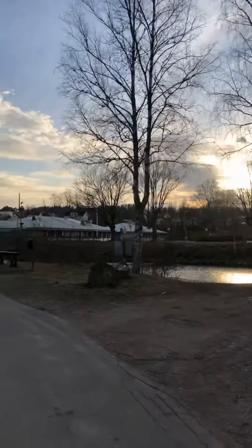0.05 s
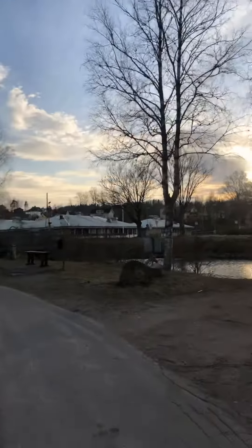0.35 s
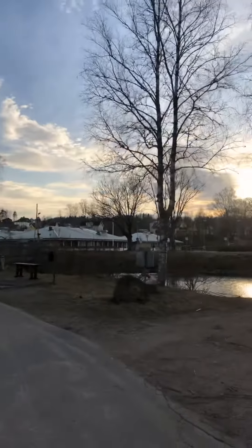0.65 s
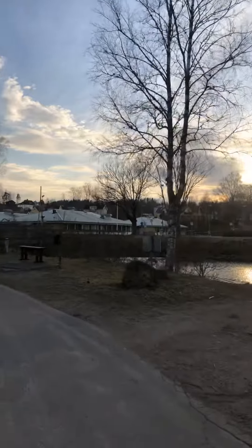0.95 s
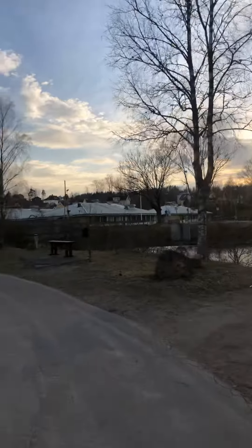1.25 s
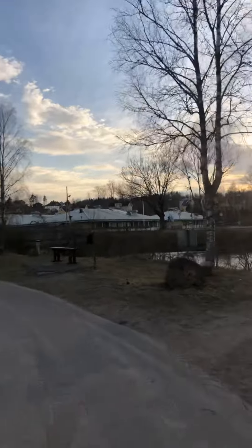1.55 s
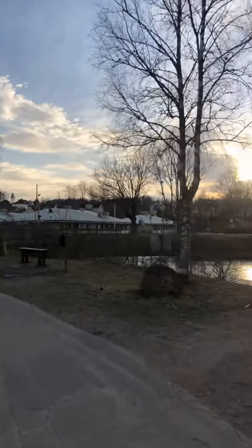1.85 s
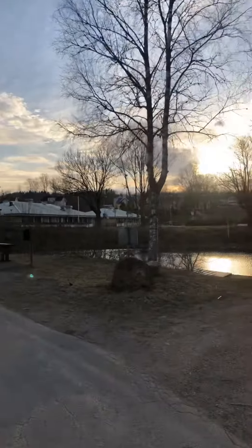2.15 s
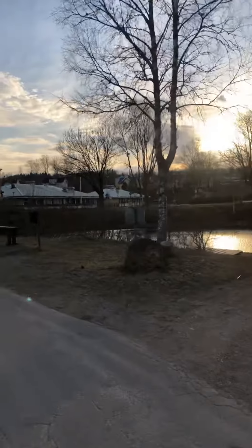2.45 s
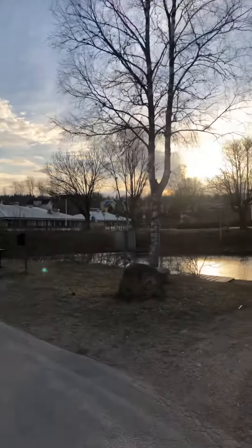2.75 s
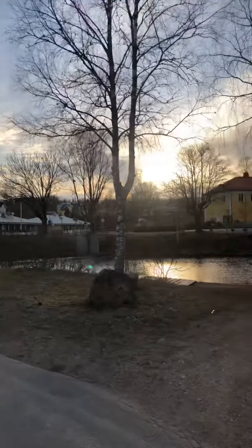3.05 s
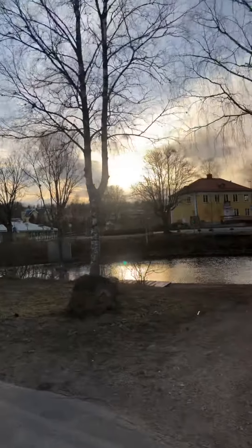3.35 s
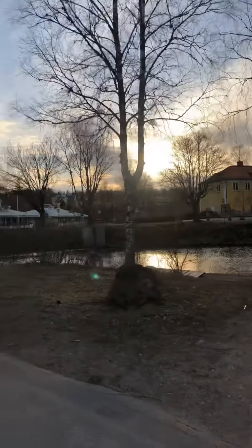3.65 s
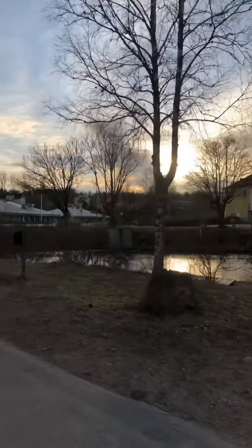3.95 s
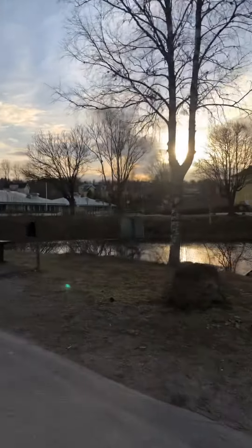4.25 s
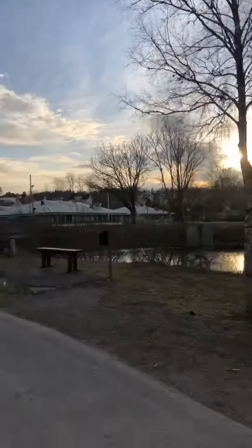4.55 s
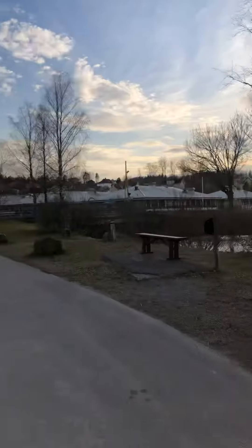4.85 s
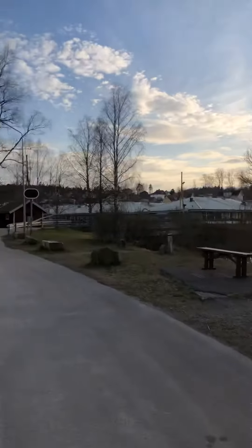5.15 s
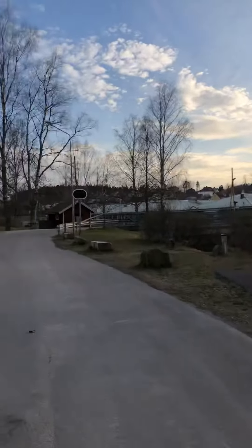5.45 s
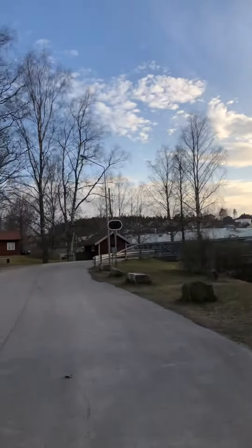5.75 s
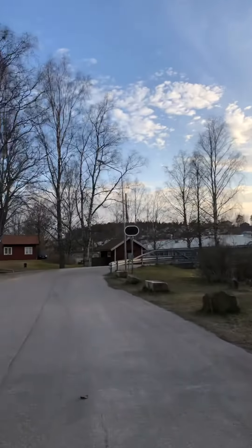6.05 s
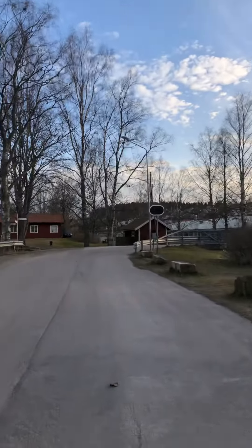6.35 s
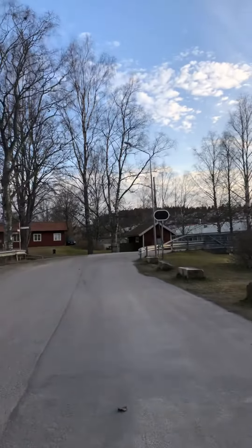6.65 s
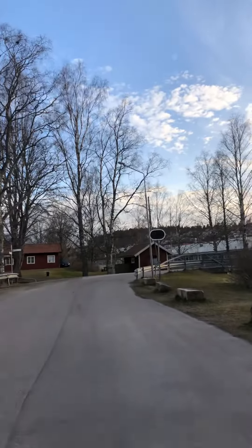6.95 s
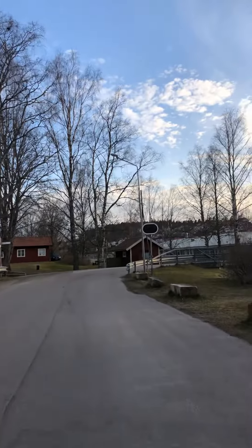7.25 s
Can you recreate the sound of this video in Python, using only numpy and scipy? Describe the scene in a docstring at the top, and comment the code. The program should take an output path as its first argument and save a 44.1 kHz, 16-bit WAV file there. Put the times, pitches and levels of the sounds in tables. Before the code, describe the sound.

Outdoors by a pond, light wind thuds and pops on the microphone as someone walks, shoes scuffing faintly on grit. A distant gull calls briefly. Then a nearer gull gives harsh cries that break twice into high, falling squeals, followed by four short yelps, with slight echoes from across the water. The wind drops before the yelps, leaving soft footsteps and a faint distant hiss.

```python
"""A gull gives its long call over a pond: two squealing cries that break into a high register and fall,
then a run of short yelps, all from the fluttering membrane of its syrinx. Another gull answers faintly
from far off, and houses across the water throw the cries back. Someone walks with the microphone:
shoes scuff on grit, and a light wind thuds and pops on the microphone until it drops."""
import sys
import numpy as np
from scipy import signal
from scipy.fft import rfft, irfft
from scipy.io import wavfile
from scipy.ndimage import uniform_filter1d

SR = 44100
rng = np.random.default_rng(int(sys.argv[2]) if len(sys.argv) > 2 else 0)


def store_pcm(level_fs):
    """Save levels as 16-bit WAV."""
    pcm = np.round(np.clip(level_fs, -1, 1) * 32767).astype(np.int16)
    wavfile.write(sys.argv[1], SR, np.atleast_2d(pcm).T)


N = 321930
TIME = np.arange(N) / SR


# Full voice, one curve a syllable. Roughness runs 0-1; tilt is per harmonic.
# time_s, pitch_hz, second_harmonic_db, other_harmonics_db, tilt_db, roughness
CRY_CURVES = [
    [(1.6, 1207, -60.5, -80, 1, 0.4), (1.622, 1234, -53, -59.5, -4.5, 0),
     (1.648, 1258, -44.5, -55, -5, 0.16), (1.662, 1220, -49, -60.5, 4, .45),
     (1.674, 1050, -58, -73, -2, 1.1), (1.69, 900, -66, -70, -2, 1)],
    [(1.905, 981, -79, -78.5, -6, 0.4), (1.954, 1181, -61, -63, 4, .8), (1.965, 1192, -34.5, -54, 2.5, .04),
     (2.04, 1181, -39.5, -54, 1.5, .02), (2.14, 1196, -46, -52.5, -8.5, 0.06),
     (2.21, 1266, -53, -53, -2, .22), (2.28, 1278, -55, -57, 4, .25), (2.34, 1306, -62, -55, 10.5, 0.13),
     (2.378, 1370, -59, -58, 1, 0.34)],
    [(2.533, 1305, -71, -62, 3, 0.9), (2.555, 1259, -64.5, -50.5, 2.5, 0.08),
     (2.67, 1237, -60, -57.5, 0, 0.12), (2.79, 1246, -58, -62.5, -5.5, 0.11),
     (2.84, 1220, -52.5, -53, -5, 0.16), (2.905, 1113, -54, -53, -4, .55), (2.955, 1069, -57, -59, -2, .4),
     (3.015, 1044, -71, -66, 2, .45), (3.045, 915, -42, -72.5, 2, 0.05), (3.08, 861, -51, -67, 8.5, 0.27)],
    [(3.53, 870, -40, -76.5, -0.5, 0.13), (3.55, 1134, -77, -64, 5, 0.54),
     (3.572, 1228, -68.5, -54, 0.5, 0.12), (3.63, 1221, -53, -59, -1, 0.2),
     (3.69, 1246, -69, -50, 1.5, .12), (3.738, 1283, -74, -51, 3, .2)],
    [(4.025, 1270, -46.5, -61, -2, 0.3), (4.06, 1261, -41, -53, 4.5, 0), (4.12, 1240, -42, -54.5, 1, .2),
     (4.129, 1059, -45.5, -63.5, -1, .9), (4.14, 930, -37, -57, 3.5, 0.04),
     (4.158, 887, -60.5, -59, -7, .9)],
    [(4.314, 963, -41, -67, -18.5, 0), (4.33, 1018, -39, -71, -12, 0), (4.36, 1069, -51.5, -53.5, 3, 0.22),
     (4.385, 1097, -34.5, -59.5, 1, 0)],
    [(4.508, 1020, -40.5, -73, 1.5, 0.08), (4.53, 965, -41, -49.5, 1, 0.06),
     (4.574, 1001, -42, -67.5, 0.5, .3), (4.587, 903, -50.5, -64, 4.5, .5)],
]
# High, whistling register, one curve a squeal: time_s, pitch_hz, fundamental_db, second_harmonic_db
SQUEAL_CURVES = [
    [(2.374, 3370, -38.5, -58), (2.47, 3337, -39, -56), (2.505, 3243, -34.5, -45),
     (2.54, 3200, -38.5, -46.5)],
    [(3.735, 3195, -42.5, -44), (3.785, 3222, -39, -44.5), (3.825, 3194, -42.5, -44),
     (3.87, 3040, -38, -46), (3.92, 2777, -41, -45), (3.97, 2644, -43.5, -45.5), (4.03, 2540, -42, -45.5)],
    [(4.38, 2464, -41.5, -77), (4.44, 2524, -44, -73), (4.48, 2468, -38, -53), (4.512, 2393, -35.5, -62)],
]
# Closing yelps; the third and upper harmonics are relative to level_db.
# start_s, length_s, top_hz, level_db, third_db, upper_db
YELP_NOTES = [(4.738, .229, 1079, -43, -14.5, -34), (5.133, .18, 1122, -42.5, -4.5, -35),
              (5.508, .147, 1154, -44, -10, -29), (5.901, .13, 1167, -44, -13, -39.5)]
def near_gull(squeal_rough=0.018):
    """The gull over the pond: its voice flips between two registers, then yelps."""
    out = np.zeros(N)
    for curve in CRY_CURVES:
        add(out, *cry(curve))
    for curve in SQUEAL_CURVES:
        times, pitch, *harmonics = np.transpose(curve)
        add(out, *syrinx(times, pitch, harmonics, squeal_rough))
    for note in YELP_NOTES:
        add(out, *yelp(*note))
    return out


# Resonances of the gull's throat: frequency_hz, gain_db
THROAT_RESONANCES = [(900, -20), (1180, -20), (1290, 1.5), (2900, 0.5), (3400, -3.5), (3650, -5.5),
                     (3820, 0), (4400, 3), (4900, 2.5), (5500, 2), (5950, 11), (6300, 1.5), (7000, -0.5)]
def cry(curve, waver_db=5, waver_s=0.04, membrane_db=(0, 0, 0, 0, -8.5, -19)):
    """A dominant second harmonic; the others waver and slide through the resonances of the throat."""
    knots, *controls = np.transpose(curve)
    times = np.linspace(knots[0], knots[-1], num=200)
    pitch, second, others, bright, rough = (np.interp(times, knots, control) for control in controls)
    drifts = rng.standard_normal((6, 60))
    harmonics = []
    for k, (falloff, drift) in enumerate(zip(membrane_db, drifts), 1):
        tilt = bright * (k - 4) * (k > 2)
        waver = waver_db * np.interp((times - times[0]) / waver_s, np.arange(len(drift)), drift)
        throat = value_at(THROAT_RESONANCES, k * pitch)
        harmonics.append(second if k == 2 else others + falloff + tilt + waver + throat)
    return syrinx(times, pitch, harmonics, rough)


# Balance of a yelp's harmonics 4, 5 and 6: gain_db
YELP_OVERTONES = [-1, 0, -15]
def yelp(start, length, top_hz, level_db, third_db, upper_db, rough=0.06, slack=0.49,
         attack_s=0.017, release_s=0.031, swell_db=4, waver_db=1.3, crack_db=27.5):
    """A short note that scoops up, swells, and cracks as its pitch drops; a slack membrane rattles."""
    t = np.linspace(0, length, num=60)
    scoop = np.exp(-t / 0.0141)
    drop = np.exp((t - length) / 0.012)  # the breath ends
    sag = 0.0968 * scoop + 0.2 * drop
    edges = np.maximum(1 - t / attack_s, 0) + np.maximum(1 - (length - t) / release_s, 0)
    held = level_db - 24 * edges
    second = held + swell_db * (np.sin(np.pi * t / length) - 2 / np.pi)
    upper = [held + upper_db + colour + crack_db * np.sqrt(drop) for colour in YELP_OVERTONES]
    waver = waver_db * unit_rms(uniform_filter1d(rng.standard_normal((6, 60)), size=8, axis=1))
    harmonics = np.array([second - 37, second, held + third_db, *upper]) + waver
    return syrinx(start + t, top_hz * (1 - sag), harmonics, rough + slack * sag)


def syrinx(times, pitch, harmonics_db, rough, jitter=0.015, rasp=0.96, doubling=0.048, edge_s=0.005):
    """A fluttering membrane that jitters and rasps as it roughens. Returns start time and sound."""
    t = np.arange(times[0] - edge_s / 2, times[-1] + edge_s / 2, 1 / SR)
    rough = np.interp(t, times, np.clip(rough * np.ones(len(times)), 0, 1))
    glide = uniform_filter1d(np.interp(t, times, pitch), size=500)
    hz = glide * (1 + jitter * rough * wander(len(t), 220))
    phase = 2 * np.pi * np.cumsum(hz) / SR
    out = np.zeros(len(t))
    for k, db in enumerate(harmonics_db, 1):
        flutter = np.exp(0.16 * np.sqrt(k / 2) * (wander(len(t), 70) + 1j * wander(len(t), 70)))
        sidebands = rasp * (wander(len(t), 170) + 1j * wander(len(t), 250))
        shimmer = wander(len(t), 49)
        subharmonic = doubling * np.exp(-0.5j * phase)  # strong and weak cycles alternate
        envelope = gain(np.interp(t, times, db)) * (flutter + rough * (sidebands + shimmer + subharmonic))
        out += np.sqrt(2) * (envelope * np.exp(1j * k * phase)).real
    return t[0], out * signal.windows.tukey(len(t), 2 * edge_s / (t[-1] - t[0]))


# The answering bird: start_s, length_s, pitch_hz, level_db, tilt_db (per harmonic)
FAR_NOTES = [(0.013, 0.053, 1172, -60.5, 0), (0.263, .026, 1098, -63, -10.5), (.353, 0.055, 1107, -60, -6),
             (0.552, 0.018, 1123, -64.5, 3), (0.577, 0.043, 1228, -58, 3), (.595, .06, 1122, -57, 6),
             (0.676, 0.17, 1126, -66, 2.5), (0.87, .09, 1055, -66, 1), (1.228, 0.022, 1007, -64, 3),
             (1.26, 0.054, 1234, -65, -3.5), (7.127, 0.13, 1130, -77, -13)]
def far_gull(colour_db=(-25, -1, -2, -14), arch=0.04, rough=0.35):
    """A second gull, far off: short hoarse notes, each an arch of pitch."""
    out, progress = np.zeros(N), np.linspace(0, 1, num=9)
    droop = (2 * progress - 1) ** 2
    for start, length, pitch, db, tilt in FAR_NOTES:
        harmonics = [db + colour + tilt * (k - 1) - 6 * droop for k, colour in enumerate(colour_db)]
        add(out, *syrinx(start + length * progress, pitch * (1 - arch * droop), harmonics, rough))
    return out


# Echoes off the houses, coming and going as the walker moves: delay_s, gain_db, strongest_s, width_s
HOUSE_ECHOES = [(.013, -13.5, 2.8, 0.54), (.031, -10.5, 2.7, 0.22), (0.03, -12, 4.03, 0.14),
                (.058, -14.5, 3.97, 0.11), (.147, -25.5, 4.25, .12), (.088, -17.5, 4.6, .1),
                (.262, -6, 4.72, 0.12), (0.15, -3.5, 5.03, 0.051), (.041, -9, 5.33, .035),
                (.028, -8.5, 5.88, .25), (.35, -21, 6.3, 0.23)]
# Decay of the open-air tail: frequency_hz, t60_s
TAIL_DECAY = [(500, 0.25), (2300, 0.95), (4000, .6), (7000, 0.8)]
def pond_echoes(call, tail_db, scatter_db, scatter_t60_s=0.18, smear=2.3, reflections_per_s=1500):
    """A call with quick scatter from ground and trunks, echoes from across the water and a thin tail."""
    t = TIME[:SR]
    near, far = rng.standard_normal((2, SR)) * (rng.random((2, SR)) < reflections_per_s / SR)
    near *= gain(-60 * t / scatter_t60_s) * (t > 0.006)
    scattered = signal.fftconvolve(call, near / np.linalg.norm(near))[:N]
    bounced = (call + smear * scattered) / np.hypot(1, smear)  # uneven walls smear what they return
    out = call + gain(scatter_db) * scattered
    for delay, db, strongest, width in HOUSE_ECHOES:
        cutoff_hz = min(5600 * (0.054 / delay) ** 0.71, SR / 3)  # longer paths lose more treble
        dulled = signal.sosfilt(signal.butter(3, cutoff_hz, fs=SR, output="sos"), bounced)
        presence = np.exp(-0.5 * ((TIME + delay - strongest) / width) ** 2)
        add(out, delay, gain(db) * dulled * presence)
    hz, age, spectrum = signal.stft(far, SR, nperseg=256)
    decay = gain(-60 * age / value_at(TAIL_DECAY, hz)[:, None])
    tail = signal.istft(spectrum * decay, SR, nperseg=256)[1]
    return out + gain(tail_db) * signal.fftconvolve(call, tail / np.linalg.norm(tail))[:N]


# The strongest puffs of air on the microphone: time_s, peak_db, pitch_hz, length_s
STRONG_PUFFS = [(.024, -25.5, 225, 0.0088), (.042, -34, 240, 0.0096), (.068, -24.5, 230, 0.0072),
                (.151, -39, 270, .004), (.44, -41.5, 184, 0.0081), (.503, -37.5, 210, 0.0056),
                (.647, -37, 260, .004), (.664, -36.5, 236, .006), (.687, -34.5, 225, 0.0051),
                (.808, -27.5, 230, 0.0035), (.885, -34.5, 230, 0.0078), (1.12, -30, 215, 0.012),
                (1.168, -30.5, 230, 0.0033), (1.548, -32, 315, 0.0065), (1.759, -36, 205, .0075),
                (1.899, -34, 295, .008), (1.942, -31.5, 200, 0.0066), (2.05, -26.5, 210, 0.0084),
                (2.175, -36.5, 225, .006), (2.354, -36.5, 290, 0.0066), (2.532, -26, 280, 0.0041),
                (2.615, -32.5, 300, .0027), (2.631, -30.5, 250, 0.0039), (2.844, -32, 220, 0.0073),
                (2.94, -27.5, 370, 0.0023), (2.955, -28.5, 330, 0.0034), (2.978, -28, 250, .004),
                (3.061, -33.5, 255, 0.0063), (3.408, -26.5, 280, 0.0023), (3.421, -36, 340, 0.029),
                (3.442, -36.5, 230, 0.009), (3.756, -32, 240, 0.0056), (3.869, -37, 200, 0.0052),
                (4.084, -36.5, 275, 0.0065), (4.256, -38.5, 250, 0.0071)]
# Flurries of weaker puffs: start_s, length_s, peak_db
PUFF_FLURRIES = [(0.126, 0.13, -44), (0.519, 0.039, -39.5), (1.085, .02, -34.5), (1.175, .03, -36),
                 (1.547, 0.052, -34.5), (1.812, .56, -41), (2.99, .06, -37.5), (3.45, .015, -36.5),
                 (3.98, .02, -46), (4.111, 0.18, -43.5), (4.341, .02, -48), (4.472, 0.019, -48.5)]
def wind_thuds(puffs_per_s=29, spread_db=3, puff_hz=250, puff_s=0.005, churn_db=-11):
    """Low thuds of air right on the microphone, with a churn of turbulence clinging to each."""
    puffs = list(STRONG_PUFFS)
    for start, span, db in PUFF_FLURRIES:
        count = max(round(span * puffs_per_s), 1)
        places, sizes = rng.random(40), rng.standard_normal((40, 2))
        for k, (place, (loud, long)) in enumerate(zip(places[:count], sizes)):
            when = start + span * (k + place) / count
            stretch = np.exp(0.3 * long)  # longer puffs are deeper
            puffs.append((when, db + spread_db * loud, puff_hz / np.sqrt(stretch), puff_s * stretch))
    thuds = air_pulses(puffs, rise_share=0.88, sharpness=5.04)
    window = np.hanning(1800)
    force = np.sqrt(abs(signal.fftconvolve(thuds ** 2, window / window.sum(), "same")))
    churn_spectrum = [(60, -18.5), (150, 1), (380, 5.5), (600, -10.5), (1000, -33), (2000, -51.5)]
    churn = coloured(rng.standard_normal(N), churn_spectrum)
    return thuds + gain(churn_db) * force * churn


# Sharper gusts in the microphone's port: time_s, peak_db, pitch_hz, length_s
PORT_GUSTS = [(.392, -41, 890, .007), (.979, -36.5, 887, .008), (1.231, -29.5, 984, 0.0035),
              (1.29, -40, 845, 0.013), (1.316, -32.5, 1030, 0.0024), (1.361, -31, 934, 0.0035),
              (1.529, -38.5, 1034, 0.0023), (1.644, -29, 920, 0.0051), (2.758, -32.5, 884, 0.011),
              (2.893, -43, 918, .008), (3.136, -44.5, 835, .015), (3.262, -31.5, 960, .007),
              (3.289, -38, 956, .003), (3.303, -35, 1060, 0.0035), (3.551, -43, 846, 0.014)]
def wind_pops(ring_hz=880, ring_width_hz=130, eddy_t60_s=0.17, ring_db=-5, lead_s=0.0022):
    """Wind pops in the microphone's port; the eddy around each keeps a narrow resonance ringing."""
    # a weaker pop trails each gust
    trailing = [(when + rng.uniform(0.0119, 0.01224), db - 12.5, 836, 0.015) for when, db, *_ in PORT_GUSTS]
    pops = air_pulses(list(PORT_GUSTS) + trailing, rise_share=0.66, sharpness=4.55)
    t = TIME[:SR // 3] - TIME[SR // 30]
    eddy = np.where(t < 0, np.exp(-abs(t) / lead_s), gain(-60 * abs(t) / eddy_t60_s))
    stir = signal.fftconvolve(pops, eddy * rng.standard_normal(len(t)))[SR // 30:][:N]
    ring = signal.lfilter(*signal.iirpeak(ring_hz, ring_hz / ring_width_hz, fs=SR), stir)
    return pops + gain(ring_db) * pops.std() * unit_rms(ring)


def air_pulses(rows, rise_share, sharpness):
    """Each blow of air is a few cycles that swell quickly and die a little more slowly."""
    out, t = np.zeros(N), np.arange(-SR // 40, SR // 15) / SR
    for when, db, hz, length in rows:
        age = np.maximum(1 + t / (rise_share * length), 0)
        swell = (age * np.exp(1 - age)) ** sharpness
        add(out, when + t[0], gain(db) * swell * np.cos(2 * np.pi * (hz * t + rng.random())))
    return out


# Strokes of a sole: loudest_s, relative_level_db, rise_s, fall_s, tilt_db (per octave)
SOLE_STROKES = [(.61, -53, 0.081, .08, -4), (.624, -46, .004, .02, -4), (.69, -54, 0.13, 0.26, -2),
                (.76, -53.5, .03, .09, 2), (1.52, -54.5, 0.16, 0.13, -1), (1.61, -49.5, 0.12, 0.095, -4.5),
                (2.54, -55, .02, 0.057, 3.5), (3.337, -57, 0.023, 0.02, -4.5),
                (5.22, -64.5, 0.023, 0.015, -18.5), (5.68, -68.5, .02, 0.045, -13)]
# Spectrum of grinding grit: frequency_hz, gain_db
GRIT_SPECTRUM = [(710, -38), (1200, -10), (1500, -15), (1590, -9.5), (2000, -2.5), (2160, -14.5),
                 (2360, -1), (3450, 3.5), (4650, -9), (6800, -7.5), (7390, -24.5), (9610, -48.5),
                 (16300, -120)]
def shoe_scuffs(grains_per_s=4000, slide=0.61, edge_db=-26, patchy_db=1.8):
    """Below the microphone, fine grit grinds under a sliding sole; its colour shifts with the stroke."""
    sizes = gain(3 * np.minimum(rng.exponential(1, N), 3))
    grains = rng.standard_normal(N) * sizes * (rng.random(N) < grains_per_s / SR)
    grit = coloured(unit_rms(grains) + slide * rng.standard_normal(N), GRIT_SPECTRUM)
    times, *_, tilts = np.transpose(SOLE_STROKES)
    tilt, out = np.interp(TIME, times, tilts), np.zeros(N)
    edges_hz = np.geomspace(700, 7600, num=9)
    for low, high in zip(edges_hz, edges_hz[1:]):
        band = signal.sosfilt(signal.butter(2, [low, high], "bandpass", fs=SR, output="sos"), grit)
        out += band * gain(patchy_db * wander(N, 50) + tilt * np.log2(high / 3500))
    pressure = sum(gain(db + edge_db * np.maximum((when - TIME) / rise, (TIME - when) / fall))
                   for when, db, rise, fall, _ in SOLE_STROKES)
    return gain(8.5) * out * pressure


# The walker's steps: time_s, level_db
STEPS = [(5.079, -64), (5.689, -65), (6.2, -65.5), (6.34, -66), (6.77, -72.5)]
def footfalls(width_s=0.037):
    """Dull pats of a soft sole on asphalt, close by."""
    spectrum = [(60, -30), (130, -16.5), (210, 2.5), (400, -1.5), (800, -12.5), (1800, -11), (4000, -32)]
    pat = coloured(rng.standard_normal(N), spectrum)
    return pat * sum(gain(db) * np.exp(-((TIME - when) / width_s) ** 2) for when, db in STEPS)


# Strength of the breeze: time_s, level_db
BREEZE_LEVELS = [(0, -62.5), (.3, -67.5), (.55, -64.5), (1.55, -61), (2.2, -66), (2.45, -73), (2.56, -62),
                 (4.3, -63), (4.5, -66), (4.65, -105)]
# Its spectrum: frequency_hz, gain_db
BREEZE_SPECTRUM = [(60, -36), (120, -17.5), (200, -1.5), (320, -9), (450, -2.5), (750, 3), (900, -3),
                   (1150, -26.5), (2000, -37.5), (4000, -52.5)]
def breeze(gust_db=2):
    """A lumpy breeze blows across the microphone, then drops."""
    rush = coloured(rng.standard_normal(N), BREEZE_SPECTRUM)
    return rush * level_curve(BREEZE_LEVELS) * gain(gust_db * wander(N, 21))


# Outdoor wash beyond the pond: time_s, level_db
WASH_LEVELS = [(0, -65), (2.5, -67), (4, -65), (5.3, -67), (6.2, -66), (6.6, -72.5), (6.85, -67.5),
               (7.15, -73), (7.3, -68.5)]
# Its spectrum: frequency_hz, gain_db
WASH_SPECTRUM = [(100, -18), (170, -1), (300, 10), (500, 9.5), (800, 5), (1500, 1.5), (2250, 1.5),
                 (3500, -1), (4500, -3.5), (6200, -5.5), (7400, -16)]
# Its bass, which dips near the end: time_s, gain_db
WASH_BASS_GAINS = [(6.7, -3), (7.1, -11), (7.25, -2)]
def distant_wash(flicker_db=2.28, bass_hz=450):
    """The faint hiss of the distance, flickering slightly."""
    wash = coloured(rng.standard_normal(N), WASH_SPECTRUM)
    wash *= level_curve(WASH_LEVELS) * gain(flicker_db * wander(N, 14))
    bass = signal.sosfiltfilt(signal.butter(2, bass_hz, fs=SR, output="sos"), wash)
    bass_gain = gain(np.interp(TIME, *np.transpose(WASH_BASS_GAINS)))
    return wash + bass * (bass_gain - 1)


def gain(db):
    """Decibels to amplitude."""
    return 10 ** (np.asarray(db) / 20)


def unit_rms(x):
    """Scales to rms 1."""
    return x / np.sqrt(np.mean(x ** 2) + 1e-20)


def value_at(points, hz):
    """Interpolates (frequency_hz, value) points on a log-frequency axis."""
    frequencies, values = np.transpose(points)
    return np.interp(np.log(hz + 1), np.log(frequencies + 1), values)


def coloured(x, spectrum):
    """Filters by (frequency_hz, gain_db) points, at rms 1."""
    hz = np.fft.rfftfreq(len(x), 1 / SR)
    return unit_rms(irfft(rfft(x) * gain(value_at(spectrum, hz)), len(x)))


def wander(size, rate_hz):
    """Smooth random drift of rms about 1, moving up to about rate_hz."""
    hz = np.fft.rfftfreq(size + SR, 1 / SR)
    spectrum = rfft(rng.standard_normal(size + SR)) / (1 + (hz / rate_hz) ** 2)
    return unit_rms(irfft(spectrum, size + SR))[:size]


def level_curve(rows):
    """(time_s, level_db) rows as a gain over the scene, silent outside them."""
    return gain(np.interp(TIME, *np.transpose(rows), left=-150, right=-150))


def add(mix, start_s, sound):
    """Mixes a sound in at start_s."""
    start = round(start_s * SR)
    sound = sound[max(-start, 0):]
    part = mix[max(start, 0):][:len(sound)]
    part += sound[:len(part)]


def scene(dip_at_s=5.246, dip_width_s=0.008, dip_db=-22):
    """Gulls in the open, wind and walker at one microphone; the level dips briefly during the yelps."""
    near = gain(0.51) * pond_echoes(near_gull(), tail_db=-17.5, scatter_db=-10.5)
    far = pond_echoes(far_gull(), tail_db=-13.5, scatter_db=-12.5)
    close = wind_thuds() + wind_pops() + shoe_scuffs() + footfalls() + breeze()
    dip = gain(dip_db * np.exp(-((TIME - dip_at_s) / dip_width_s) ** 2))
    return (near + far + close + distant_wash())[None] * dip


def record(dry):
    """The recorder's 80 Hz wind filter and 7.2 kHz band limit."""
    thinned = signal.sosfiltfilt(signal.butter(2, 80, "highpass", fs=SR, output="sos"), dry)
    lowpass = signal.firwin(301, 7200, window=("kaiser", 8), fs=SR)
    return signal.oaconvolve(thinned, lowpass[None], "same")


dry = scene()
out = record(dry)
store_pcm(out)
```